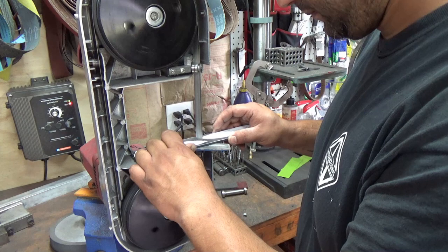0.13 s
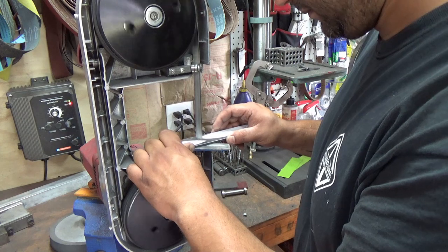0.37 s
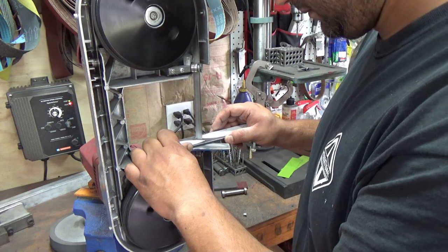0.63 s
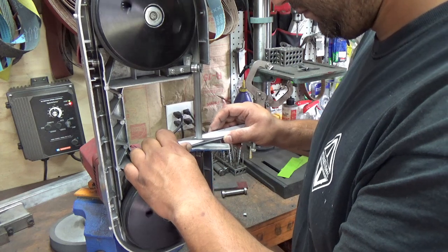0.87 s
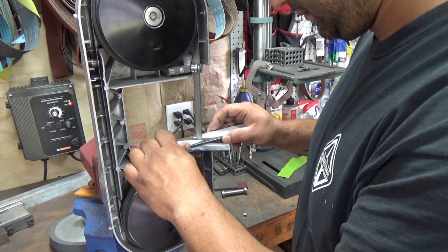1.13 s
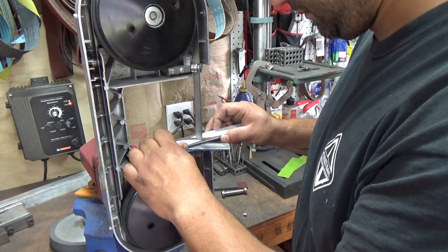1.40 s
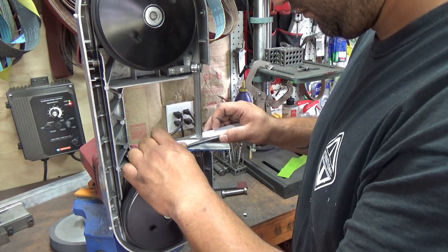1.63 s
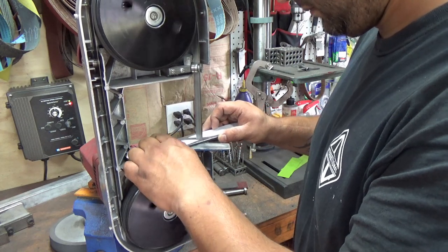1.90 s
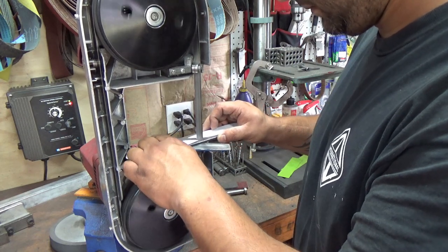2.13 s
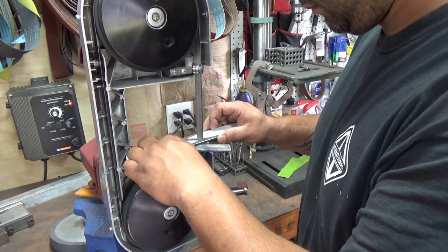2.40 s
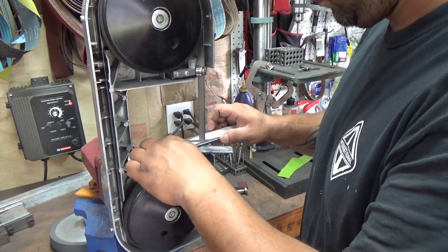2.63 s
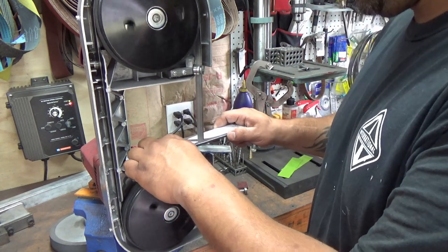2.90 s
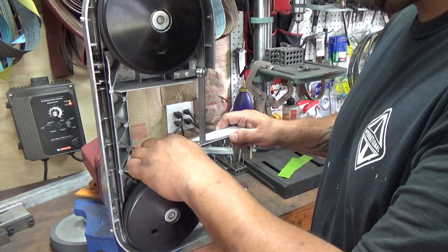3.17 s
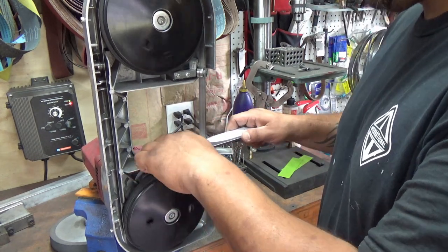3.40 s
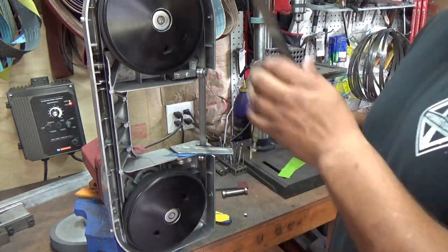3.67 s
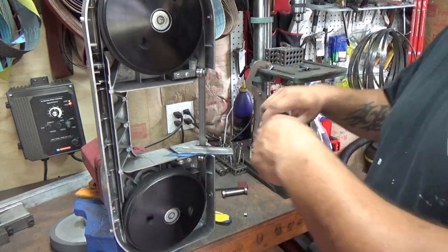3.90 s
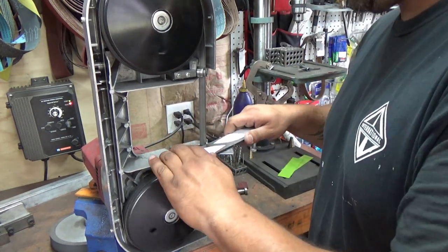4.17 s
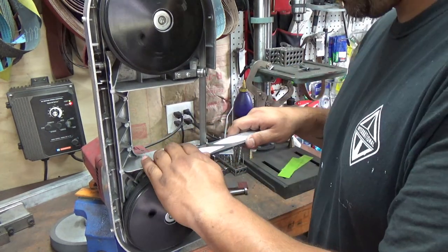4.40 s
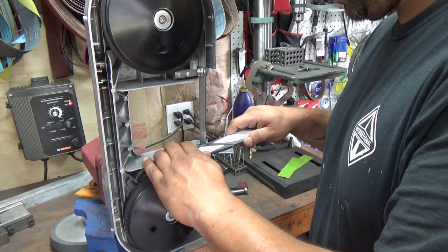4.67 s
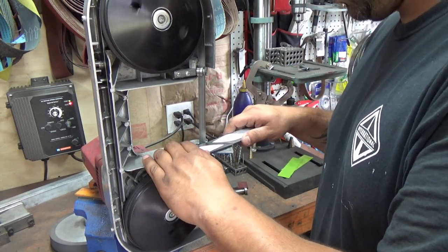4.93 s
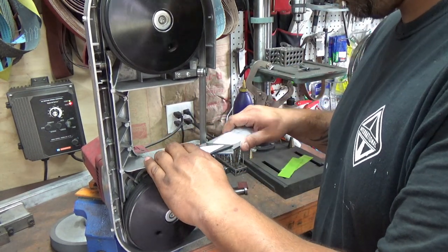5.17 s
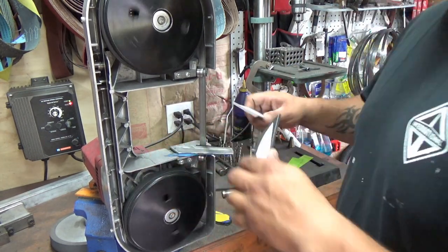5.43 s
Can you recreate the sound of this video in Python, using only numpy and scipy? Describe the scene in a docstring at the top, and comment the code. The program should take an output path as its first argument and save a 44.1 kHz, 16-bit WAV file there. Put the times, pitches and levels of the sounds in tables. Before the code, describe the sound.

Shrill, glassy electric motor whine over bright hiss while a blade cuts metal, a short buzzing chatter, then a higher free-running whine.

```python
"""Bandsaw cutting a steel bar

A geared bandsaw cuts a steel bar in a workshop, played back much faster than life.
The motor whine is a stack of sines: its pitch is low under load and climbs when the bar leaves the blade.
Teeth rasp, the blade sings and the bar chatters as wavering sines; fan and blade hiss as coloured noise.
Soft knocks are short dying sines. Overtones above the sampling limit fold back and slide against the whine."""
import sys
import numpy as np
from scipy import signal
from scipy.fft import rfft, irfft, next_fast_len
from scipy.io import wavfile
from scipy.ndimage import uniform_filter1d

SR = 44100
rng = np.random.default_rng(int(sys.argv[2]) if len(sys.argv) > 2 else 0)


def invert_db(level):
    """Linear amplitude ratio for a level in decibels (20 dB per decade), elementwise."""
    return 10 ** (np.asarray(level, dtype=float) / 20)


def transcribe(u):
    """Save the signal u as a 16-bit wav file named by the first command-line argument.

    u: samples, shape (n,) or (channels, n), limited to [-1, 1]; the rate is SR.
    q: integer samples, one column per channel.
    """
    v = np.clip(np.atleast_2d(u).T, -1, 1)
    q = np.round(v * 32767).astype(np.int16)
    wavfile.write(sys.argv[1], SR, q)


N = 244755   # length in samples
TIME = np.arange(N) / SR
FOLD_HZ = 48000   # tones above half of this fold back
EARS = np.array([[1], [-1]])   # left, right


def ramp(start_s, length_s):
    """Rises in a straight line from 0 to 1."""
    return np.clip((TIME - start_s) / max(length_s, .005), 0, 1)


def at_hz(rows, hz):
    """Reads the columns of a spectrum table on a log pitch axis."""
    table_hz, *columns = np.transpose(rows)
    return [np.interp(np.log(hz + 1), np.log(table_hz), column) for column in columns]


def drift(rate_hz):
    """Slow random wandering of spread 1: noise smoothed twice, drawn every 50 samples."""
    memory = np.exp(-2 * np.pi * rate_hz * 50 / SR)
    noise = rng.standard_normal(N // 50 + 2002)
    slow = signal.lfilter([1], [1, -2 * memory, memory * memory], noise)[2000:]   # skip the settling
    return np.interp(np.arange(N) / 50, np.arange(len(slow)), slow / slow.std())


def line(phase, level_db, waver_db, blur):
    """A sine of given rms level; level and phase (blur, radians) waver, and the two ears differ a little."""
    gain = np.sqrt(2) * invert_db(level_db + waver_db * drift(19.0))
    gain = gain * invert_db(0.63 * EARS)
    apart = 0.25 * rng.standard_normal() + 0.077 * drift(3.8)
    start = rng.uniform(0, 2 * np.pi)
    return gain * np.sin(phase + blur * drift(19.5) + start + apart * EARS)


# Motor speed before inertia rounds it, as the pitch of the whine.
# Columns: start_s, pitch_hz
MOTOR_SPEED = [(0, 2086), (.1, 2095), (.38, 2080), (.68, 2085), (.79, 2097), (.96, 2085), (1.13, 2108),
               (1.22, 2096), (1.41, 2098), (1.57, 2085), (1.72, 2099), (2.22, 2098), (2.34, 2089),
               (2.49, 2105), (2.66, 2107), (2.83, 2256), (2.91, 2276), (3.16, 2186), (3.32, 2270),
               (3.51, 2293), (3.62, 2322), (3.84, 2342), (4.22, 2342.5), (4.52, 2329), (4.68, 2285),
               (4.82, 2271), (5.03, 2234), (5.19, 2230), (5.41, 2307), (5.55, 2326)]


def whine_pitch():
    """The motor's inertia rounds every change of speed: two running averages of 60 ms."""
    start_s, pitch_hz = np.transpose(MOTOR_SPEED)
    pitch = np.interp(TIME, start_s, pitch_hz)
    lag = round(.06 * SR)
    for _ in range(2):
        pitch = uniform_filter1d(pitch, lag, mode="nearest")
    return pitch


# Housing resonances that lift an overtone passing through them.
# Columns: centre_hz (before folding), width_hz, lift_db
HOUSING_RESONANCES = [(2110, 78, 5), (2155, 56, 10.5), (2244, 54, 6.5), (2343, 32, 11), (4172, 80, 11.5),
                      (4482, 280, 15), (6241, 280, 15), (6599, 140, 7.5), (6737, 56, 4), (7004, 89, 7),
                      (8325, 26, 11), (8397, 70, 19), (8807, 158, 14), (9051, 216, 11), (9332, 50, 6.5),
                      (10542, 157, 9), (11108, 659, 9.5), (11706, 30, 3), (12479, 140, 8),
                      (12681, 185, 7.5), (12907, 150, 3), (13395, 75, 3), (14059, 75, 7.5),
                      (43900, 450, 14), (44630, 150, 6), (45020, 160, 9), (45500, 300, 10), (46200, 250, 6),
                      (46793, 170, 7)]


def housing_db(hz):
    """Each resonance lifts a tone by a bell-shaped amount, most at its centre."""
    return sum(lift_db / (1 + (2 * (hz - centre_hz) / width_hz) ** 2)
               for centre_hz, width_hz, lift_db in HOUSING_RESONANCES)


# Overtones of the motor whine, away from the housing resonances.
# Columns: multiple (times the whine pitch), level_db (rms)
WHINE_OVERTONES = [(1.0, -51.5), (2.0, -52), (3, -44.7), (4, -48), (5, -45.5), (6, -40.5), (20.0, -51)]


def whine(turn, pitch):
    """Overtones follow the motor, swell slowly and grow louder as they cross a housing resonance."""
    fold = 2 * np.pi * FOLD_HZ * TIME
    out = 0
    for multiple, level_db in WHINE_OVERTONES:
        lift_db = np.repeat(housing_db(multiple * pitch[::64]), 64)[:N]   # every 64 samples is enough
        swell_db = .9 * drift(4.14)
        folds = multiple * pitch[0] > FOLD_HZ / 2
        out = out + line(multiple * turn - fold * folds, level_db + lift_db + swell_db, 1.12, 0.22)
    return out


# Weaker lines: half steps, one or two shaft turns (1/11 each) beside the overtones,
# and the seventh overtone.
# Columns: multiple (times the whine pitch), loaded_db (rms), free_db (rms)
WEAK_LINES = [(0.5, -57.9, -51.0), (0.909, -60.0, -50.8), (1.091, -56.7, -50.8), (1.5, -52.7, -49.8),
              (2.5, -55.8, -43.2), (2.818, -51.1, -53.4), (3.091, -49.7, -55.4), (3.5, -48.4, -52.4),
              (3.909, -43.6, -47.9), (4.091, -50.7, -45.0), (4.5, -47.2, -52.3), (4.909, -46.9, -44.6),
              (5.091, -60.0, -42.7), (5.182, -60.0, -49.6), (5.818, -51.5, -50.8), (5.909, -42.4, -47.6),
              (6.091, -39.8, -47.6), (6.182, -47.0, -60.0), (6.5, -46.4, -48.8), (6.909, -44.5, -42.8),
              (7, -42.8, -48.2), (7.091, -45.1, -45.1), (7.182, -60.0, -49.1)]
# Lines of the gear teeth meshing.
# Columns: multiple (times the whine pitch), loaded_db (rms), free_db (rms)
GEAR_MESH = [(0.6277, -54.5, -76), (0.8371, -51, -63), (1.046, -67, -51), (1.29, -52.5, -72),
             (2.1, -49, -53)]


def weak_lines_and_gears(turn, load):
    """Weaker lines and gear mesh turn with the motor; their levels shift with the load."""
    out = 0
    for multiple, loaded_db, free_db in WEAK_LINES + GEAR_MESH:
        out = out + line(multiple * turn, free_db + load * (loaded_db - free_db), 3.5, .35)
    return out


# Further overtones that lie too high and fold back.
# Columns: multiple (times the whine pitch), loaded_db (rms), free_db (rms), before the lowest notes fade
FOLDED_OVERTONES = [(14.5, -60, -44), (16.0, -39, -51), (17.5, -60, -50), (19.5, -55, -51),
                    (20.5, -62, -56), (23.5, -59, -49), (26.5, -56, -46)]


def folded_overtones(turn, pitch, load):
    """Each is heard at its distance from the sampling rate, so some glide against the whine."""
    fold = 2 * np.pi * FOLD_HZ * TIME
    out = 0
    for multiple, loaded_db, free_db in FOLDED_OVERTONES:
        heard_hz = abs(multiple * pitch - FOLD_HZ)
        carries = np.clip(heard_hz / 250, 0, 1) ** 2   # the lowest notes do not carry
        level_db = free_db + load * (loaded_db - free_db)
        out = out + carries * line(multiple * turn - fold, level_db, 4.1, 0.26)
    return out


def teeth(turn, load):
    """The tooth rate is a rough note, and the blade sings at five times that pitch."""
    tooth_share, sing_share = .3515, 1.757   # times the whine pitch
    rasp = load ** 2 * line(tooth_share * turn, -56 + 2.5 * drift(5.3), 2.7, 0.85)
    singing = 1 - ramp(1.95, .25)   # the blade falls silent before break-through
    return rasp + singing * line(sing_share * turn, -38.5, 2.8, 0.91)


# Colour of the hiss, as relative levels.
# Columns: pitch_hz, loaded_db (per Hz), free_db (per Hz)
HISS_COLOUR = [(29.2, -24.5, -23), (60.6, -21, -21.5), (122, -19.5, -18.5), (200, -19.5, -15),
               (370, -18, -16), (614, -19.5, -19), (770, -16, -15), (1018, -17.5, -20), (1098, -11.5, -10),
               (1410, -11.5, -13.5), (2050, -6.5, -10), (2090, -7, -6), (3250, -8.5, -8),
               (5150, -4.5, -4.5), (8400, -2.5, -5.5), (11440, -1, 0), (16600, 2.5, -1)]
# Frame and wheel resonances in the hiss.
# Columns: centre_hz, width_hz, loaded_db (lift), free_db (lift)
FRAME_RESONANCES = [(1132, 116, 4.5, -3), (2186, 120, 7.5, -1), (2775, 56, 7, 4), (3450, 190, 3, -1.5),
                    (4420, 36, 0, 6.5), (5747, 190, 7, 9), (6360, 230, 3.5, 3.5), (7380, 75, 1.5, 3.5),
                    (8660, 280, 0, -1), (9650, 80, 0, 3), (11740, 180, 2, -4), (12560, 230, 5.5, 2),
                    (14700, 330, 0, 7)]
# How alike the hiss is in the two ears.
# Columns: pitch_hz, likeness (0 to 1)
EAR_LIKENESS = [(60, 0.99), (150, 0.31), (380, 0.52), (950, 0.89), (2380, 0.96), (5980, 0.83),
                (15000, 0.95)]
# How far the hiss leans to one side.
# Columns: pitch_hz, lean_db (left minus right)
HISS_LEAN = [(60, -1.5), (240, 2.5), (950, 0), (3770, 2), (15000, 0.5)]


def hiss(turn, load):
    """Fan, brushes and blade: noise through the frame resonances, its colour following the load."""
    size = next_fast_len(N)
    hz = np.arange(size // 2 + 1) * SR / size
    loaded, free = at_hz(HISS_COLOUR, hz)
    for centre_hz, width_hz, loaded_db, free_db in FRAME_RESONANCES:
        bell = 1 / (1 + (2 * (hz - centre_hz) / width_hz) ** 2)
        loaded = loaded + loaded_db * bell
        free = free + free_db * bell
    alike = np.clip(at_hz(EAR_LIKENESS, hz)[0], 0, .99)
    lean = invert_db(at_hz(HISS_LEAN, hz)[0] * EARS / 2)
    scale = np.sqrt(np.mean(invert_db(free) ** 2))
    out, together = 0, drift(6.1)   # one flicker shared by all octaves
    for colour, share in ((loaded, load), (free, 1 - load)):
        mid, side = rfft(rng.standard_normal((2, size)))
        ears = np.sqrt(1 + alike) * mid + np.sqrt(1 - alike) * side * EARS
        both = lean * invert_db(colour) * ears
        for centre in 60 * 2 ** np.arange(9):   # overlapping octaves, each with its own flicker
            octaves_away = np.log2(np.maximum(hz, 60) / centre)
            octave = np.cos(np.pi / 2 * np.clip(octaves_away, -1, 1)) ** 2
            flicker_db = 0.25 * together + (.5 + 90 / centre) * drift(6.5) + 0.62 * drift(30)
            out = out + np.sqrt(share) * invert_db(flicker_db) * irfft(both * octave, size)[:, :N]
    # shaft, gear and wheel turns
    throb = 1 + 0.091 * np.sin(turn / 11) + 0.055 * np.sin(turn / 36.0) + 0.034 * np.sin(turn / 168)
    gain_db = -20 + load * (-21.5 + 20)   # -20 running free, -21.5 loaded
    return invert_db(gain_db) * throb * out / scale / np.sqrt(2)


# Light knocks of the bar.
# Columns: start_s, level_db (relative, set before the knock's own shape), pan_db (left minus right)
BAR_KNOCKS = [(1.535, -39.5, -2), (1.563, -38.5, -5), (1.787, -38.5, -1)]


def knocks():
    """Soft low knocks on the table: a 260 Hz sine that dies away in a few milliseconds."""
    hits = np.zeros((2, N))
    for start_s, level_db, pan_db in BAR_KNOCKS:
        hits[:, round(start_s * SR)] = invert_db(level_db + pan_db * np.array([.5, -.5]))
    age_s = np.arange(2000) / SR
    knock = 2.0 * np.sin(2 * np.pi * 260 * age_s) * np.exp(-age_s / 0.0031)
    return signal.fftconvolve(hits, knock[None], axes=1)[:, :N]


# Tones of the chattering bar.
# Columns: multiple (times the chatter pitch), level_db (added to the chatter level)
CHATTER_PARTIALS = [(1.0, -0.5), (2.001, -9.5), (3.0, -2), (3.702, -5), (3.96, 0)]


def chatter():
    """At break-through the bar chatters; the pitch settles from 8 Hz above."""
    start_s, end_s, attack_s, release_s = 2.21, 2.67, 0.071, .04
    hz = 730 + 8 * (1 - ramp(start_s, 0.145))
    phase = 2 * np.pi * np.cumsum(hz) / SR
    sounding = ramp(start_s, attack_s) * (1 - ramp(end_s - release_s, release_s))
    out = 0
    for multiple, level_db in CHATTER_PARTIALS:
        out = out + sounding * line(multiple * phase, -39.5 + level_db, 2.5, 0.51 * multiple)
    return out


def scene():
    """The motor parts follow its speed; the load on them drops as the bar leaves the blade."""
    pitch = whine_pitch()
    turn = 2 * np.pi * np.cumsum(pitch) / SR   # phase of the whine
    load = (1 - ramp(2.67, 0.15)) ** 2   # 1 while cutting, 0 running free
    motor = whine(turn, pitch) + weak_lines_and_gears(turn, load) + folded_overtones(turn, pitch, load)
    return motor + teeth(turn, load) + hiss(turn, load) + knocks() + chatter()


# Gate thresholds; the gate works below the last pitch.
# Columns: pitch_hz, threshold_db (over the mean level of an 86 Hz band in the frames around)
GATE_THRESHOLDS = [(40, -9), (120, .5), (210, 1), (400, -1.5), (600, 0), (750, -4), (950, -1), (1080, -9)]


def gate(x):
    """Low bands are turned down 25 dB while under their threshold; the top is cut steeply."""
    hz, _, z = signal.stft(x, SR, "cosine", nperseg=2048, noverlap=1024)
    hz = hz[:-1, None]
    power = (abs(z[:, :-1]) ** 2).mean(axis=0)
    power = power.reshape(256, 4, -1).sum(axis=1)   # bands of four bins
    level_db = 10 * np.log10(uniform_filter1d(power, size=2) + 1e-20)
    level_db = np.repeat(level_db, 4, axis=0)
    mean_db = uniform_filter1d(level_db, size=50)   # over 50 frames, about 1.2 s
    over_db = level_db - mean_db - at_hz(GATE_THRESHOLDS, hz)[0]
    is_open = np.where(hz < GATE_THRESHOLDS[-1][0], over_db > 0, 1)
    z[:, :-1] *= np.maximum(is_open, invert_db(-25)) * (hz < 15745)
    return signal.istft(z, SR, "cosine", nperseg=2048, noverlap=1024)[1][:, :N]


def top_cut(x):
    """Nothing passes above the cut-off."""
    return signal.sosfilt(signal.butter(12, 17100, fs=SR, output="sos"), x)


def record(dry):
    """A band-wise gate thins the lows and trims the top of the finished mix."""
    mix = gate(dry)
    return top_cut(mix)


dry = scene()
out = record(dry)
transcribe(out)
```